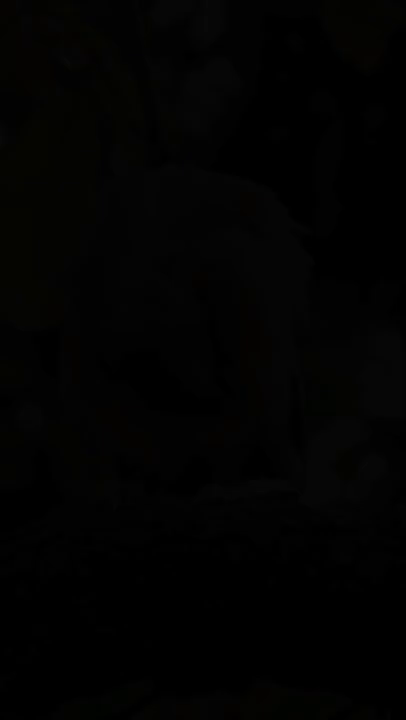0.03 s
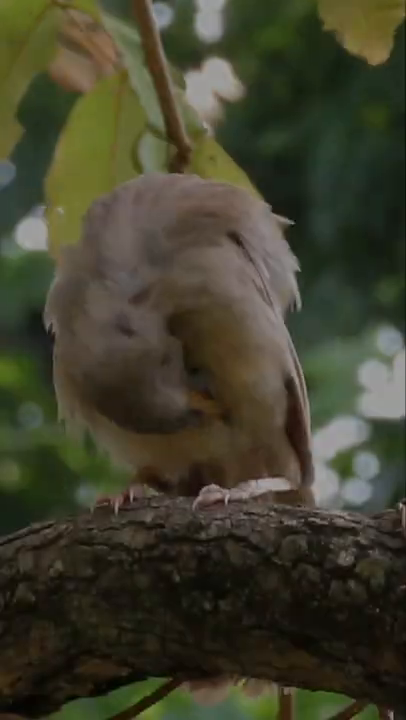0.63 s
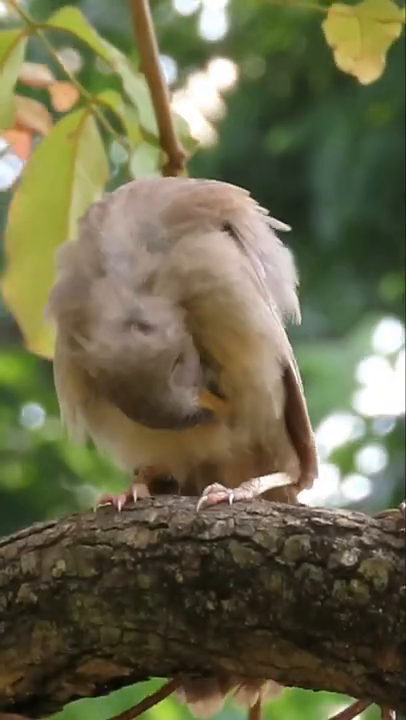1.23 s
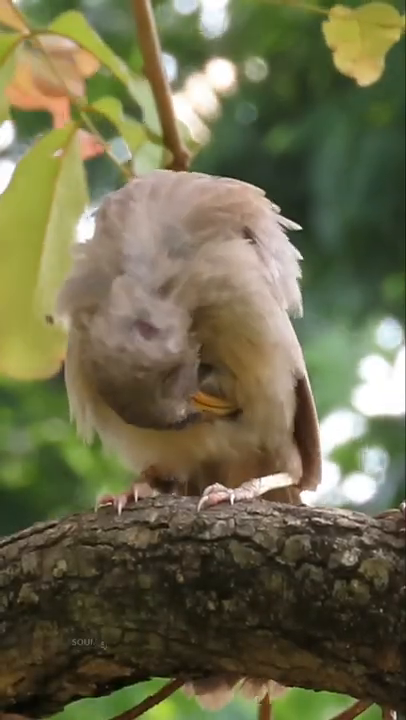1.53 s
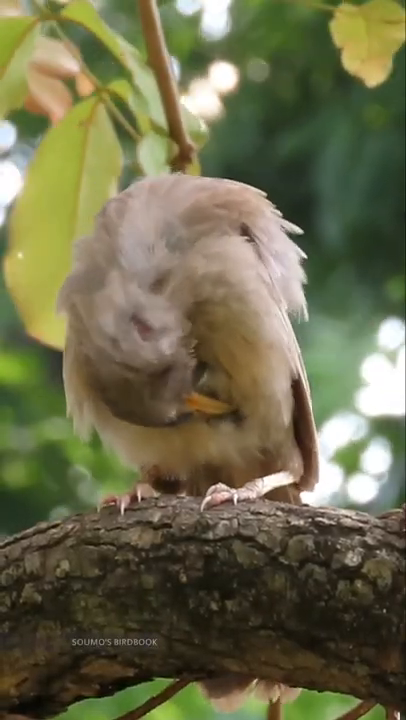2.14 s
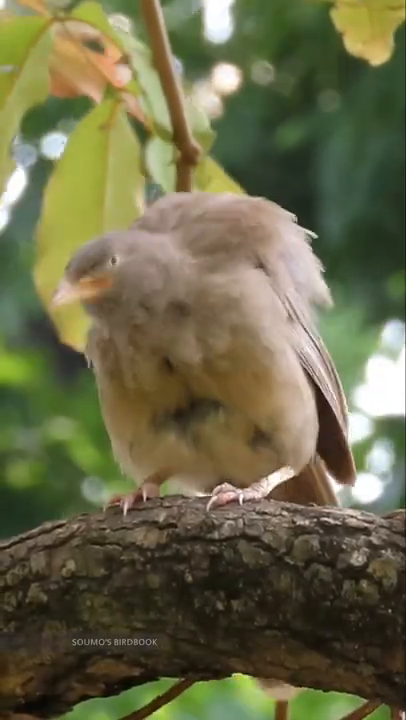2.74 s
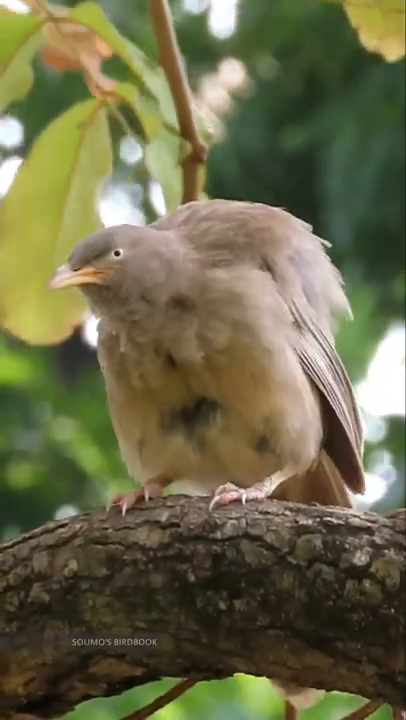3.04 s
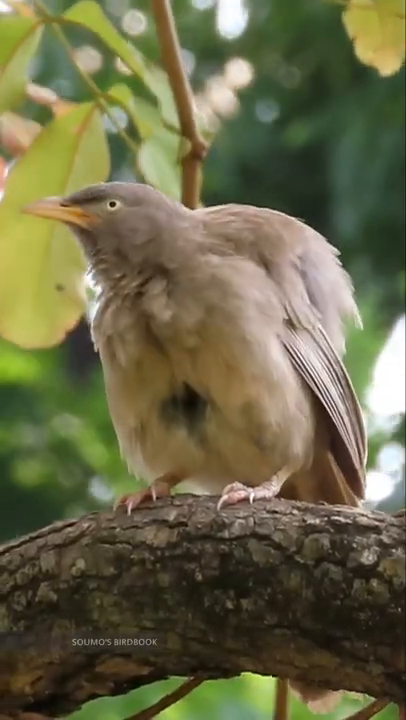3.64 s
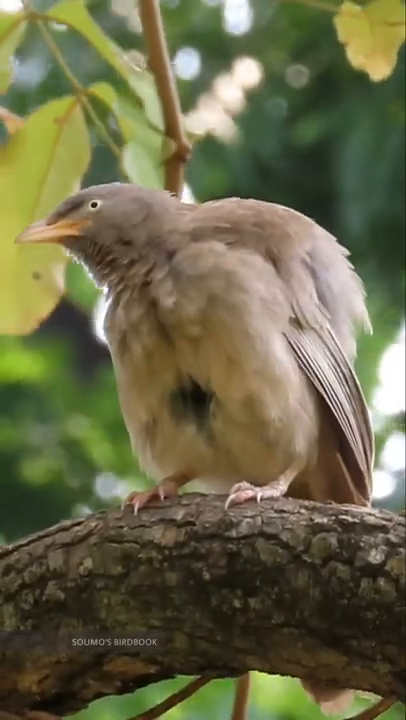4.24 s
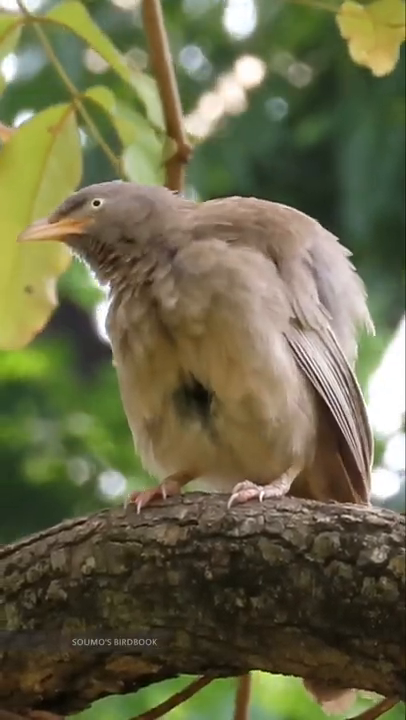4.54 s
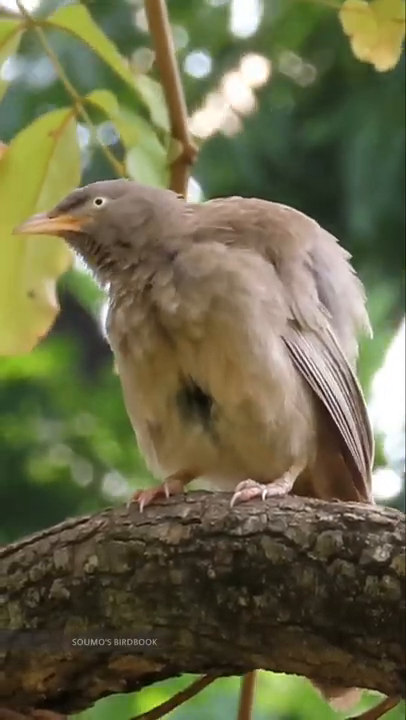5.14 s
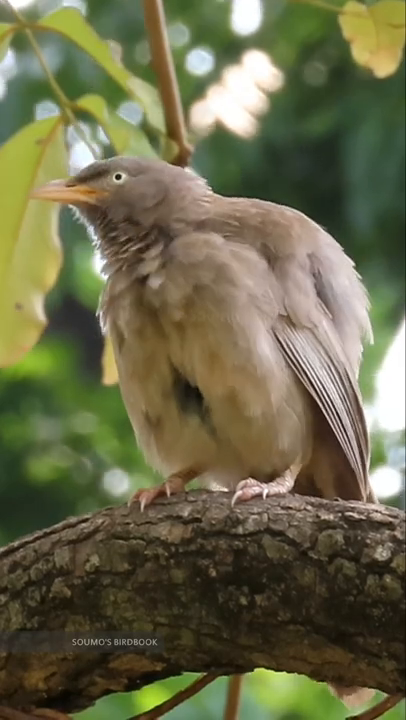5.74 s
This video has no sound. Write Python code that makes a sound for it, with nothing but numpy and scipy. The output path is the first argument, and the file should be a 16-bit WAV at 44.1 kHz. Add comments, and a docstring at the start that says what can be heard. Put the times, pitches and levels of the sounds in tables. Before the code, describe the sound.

A steady distant rumble under a soft hiss of leaves fades in over the first second and continues throughout. From about 0.5 seconds a babbler close on the right gives short buzzy notes and falling squeaks, loudest around 1.4 seconds, where it adds a harsh screech. A second babbler answers from farther left with softer hoarse notes between 1.7 and 2.2 seconds. The near bird screeches again at 2.2 and 2.9 seconds, buzzes and squeaks around 3.3 to 3.6, and screeches once more at 4.3. Small birds add faint thin peeps, then rising chips from about 3.8 seconds. Light woody taps fall near 4.3 and 5.5 seconds, with a faint low hum briefly swelling around 4.7. The farther bird returns with soft squeaks from 5 seconds to the end. Trunks and leaves give every call a light, scattered echo.

```python
"""A steady distant rumble under a hiss of leaves fades in, and babblers call to each other among trees.
A near bird on the right buzzes and squeaks in trilled whistles, and screeches with uneven syrinx pulses
that ring its throat and beak. Another answers from the left; small birds add thin peeps and chips.
Trunks and leaves scatter every call. Late on come a few woody taps and a faint low hum."""
import sys
import numpy as np
from scipy import signal
from scipy.fft import rfft, irfft, next_fast_len
from scipy.io import wavfile

SR = 44100
rng = np.random.default_rng(int(sys.argv[2]) if len(sys.argv) > 2 else 0)


def transcribe(u):
    """Save the signal u as a 16-bit wav file named by the first command-line argument.

    u: samples, shape (n,) or (channels, n), limited to [-1, 1]; the rate is SR.
    q: integer samples, one column per channel.
    """
    v = np.clip(np.atleast_2d(u).T, -1, 1)
    q = np.round(v * 32767).astype(np.int16)
    wavfile.write(sys.argv[1], SR, q)


N = 255339
TIME = np.arange(N) / SR

# the babblers' buzzy notes: t/s, length/s, f/Hz, level/dB, bird
BUZZ_NOTES = [(.502, 0.12, 2700, -37, "near"), (0.692, 0.051, 2400, -45.5, "far"),
              (0.768, 0.067, 2294, -41, "near"), (1.193, 0.1, 2556, -31.5, "near"),
              (1.825, 0.071, 2154, -46.5, "far"), (1.883, 0.055, 2384, -41.5, "far"),
              (1.915, 0.067, 2233, -37.5, "far"), (1.984, 0.06, 2487, -45.5, "far"),
              (2.056, 0.049, 2614, -42.5, "far"), (2.139, 0.048, 2596, -44.5, "far"),
              (3.251, 0.076, 2597, -42, "near"), (3.397, 0.073, 2250, -43, "near"),
              (3.472, 0.034, 2260, -45, "near"), (4.992, 0.074, 2104, -44, "far")]
# their clear squeaks, mostly falling: t/s, length/s, middle f/Hz, glide/octaves, level/dB, bird
SQUEAK_NOTES = [(0.74, 0.036, 2250, -0.52, -32.5, "near"), (.82, 0.027, 2990, 0.17, -45.5, "near"),
                (0.861, 0.015, 2354, -0.29, -33, "near"), (0.876, .045, 1608, -0.32, -43, "near"),
                (1.384, 0.013, 1958, -0.45, -29.5, "near"), (1.43, 0.029, 2316, -0.19, -23.5, "near"),
                (1.457, 0.011, 2132, -.1, -24.5, "near"), (1.666, 0.032, 1914, 0.165, -51, "far"),
                (1.711, 0.026, 1930, 0.13, -43, "far"), (1.739, 0.04, 2514, .15, -49, "far"),
                (1.775, 0.022, 2133, -0.15, -43, "far"), (2.221, .008, 2010, -0.22, -35.5, "near"),
                (3.379, 0.013, 1680, 0.25, -41.5, "near"), (3.397, 0.012, 2117, -.15, -37.5, "near"),
                (3.519, 0.02, 2480, -0.46, -36, "near"), (3.53, 0.056, 2090, -0.46, -39, "near"),
                (5.159, 0.019, 1666, -.8, -43, "far"), (5.2, 0.038, 2766, -0.456, -42.5, "far"),
                (5.261, 0.079, 1840, -0.1, -48, "far"), (5.614, 0.034, 2330, -0.33, -42, "far"),
                (5.653, 0.037, 2320, -0.092, -49, "far"), (5.749, 0.023, 2440, -0.53, -38.5, "far")]


def from_db(db):
    """Decibels to gain."""
    return 10 ** (np.asarray(db) / 20)


def rms_one(x):
    """Scale to rms 1."""
    return x / np.sqrt(np.mean(x ** 2) + 1e-20)


def at_hz(points, hz):
    """Read an EQ curve on a log-frequency axis."""
    freq, value = np.transpose(points)
    return np.interp(np.log(np.maximum(hz, 1)), np.log(freq), value)


def wobble(per_s, t):
    """Random modulation of spread near 1 along the times t."""
    knots = rng.standard_normal(1024)
    return np.interp((t - t[0]) * per_s, np.arange(len(knots)), knots)


def rumble_and_leaves(level_db, sway_db, side_db):
    """Distant rumble, alike in both ears, swells and sinks under a wider, steady hiss of air and leaves."""
    # tone of the noise bed: f/Hz, relative level/dB
    bed_eq = [(13, -20), (22, -3), (70, 2), (182, -11), (298, -10.5), (450, -14), (845, -14.5), (1280, -25),
              (1980, -28), (2150, -29.5), (2330, -31.5), (3430, -33.5), (5170, -39.5), (8020, -46),
              (15500, -59)]
    # its stereo width: f/Hz, side over mid/dB
    bed_width = [(60, -49), (110, -18), (200, -11), (380, -7), (700, -15.5), (1290, -8), (2380, -5),
                 (4400, -5), (8120, -2), (15000, 6.5)]
    size = next_fast_len(N)
    hz = np.fft.rfftfreq(size, 1 / SR)
    colour = from_db(at_hz(bed_eq, hz)) * (hz > 18)
    mid_bins, side_bins = rfft(rng.standard_normal((2, size))) * colour
    mid = irfft(mid_bins, size)[:N]
    side = irfft(side_bins * from_db(at_hz(bed_width, hz) + side_db), size)[:N]
    bed = from_db(level_db) * (mid + side * [[1], [-1]]) / np.std(mid)
    rumble = signal.sosfilt(signal.butter(1, 2900, fs=SR, output="sos"), bed)
    return bed + (from_db(sway_db * wobble(7, TIME)) - 1) * rumble


def note_span(start, length, edge_s=.003):
    """Samples a note covers, a gate with soft ends, and the time since its start."""
    at = np.flatnonzero((TIME > start - edge_s) & (TIME < start + length + edge_s))
    t = TIME[at]
    gate = np.sin(np.pi / 2 * np.clip(np.minimum(t - t[0], t[-1] - t) / edge_s, 0, 1)) ** 2
    return at, gate, np.clip(t - start, 0, length)


def whistles(notes, trill_hz, swing_hz, throb, jitter, overtone_db):
    """Near-sine notes with a trill in pitch and level: in a bird, a second, slow vibration of the syrinx."""
    out = np.zeros(N)
    for at, gate, hz, db in notes:
        t = TIME[at]
        trill = 2 * np.pi * np.cumsum(trill_hz * (1 + .07 * wobble(90, t))) / SR
        pitch_hz = hz * (1 + jitter * wobble(487, t)) + swing_hz * np.sin(trill)
        phase = 2 * np.pi * np.cumsum(pitch_hz) / SR
        tone = np.sin(phase) + from_db(overtone_db) * np.sin(2 * phase)
        out[at] += rms_one(tone * (1 + throb * np.cos(trill))) * gate * from_db(db)
    return out


def place(x, bearing, ear_db=1.5, lag_samples=.94):
    """Pan from -1 (left) to 1 (right): the nearer ear hears the sound louder and slightly sooner."""
    size = next_fast_len(N + 64)
    spectrum, w = rfft(x, size), 2 * np.pi * np.fft.rfftfreq(size)
    return np.array([from_db(side * ear_db) * irfft(spectrum * np.exp(1j * w * side * lag_samples), size)
                     for side in (-bearing, bearing)])[:, :N]


def scatter(x, t60, build_s, per_s, dull_hz):
    """Small echoes at random delays build up and die away; leaves soak up their treble."""
    t = np.arange(SR) / SR
    echoes = rng.standard_normal(SR) * (rng.random(SR) < per_s / SR)
    echoes *= (1 - np.exp(-t / build_s)) * from_db(-60 * t / t60)
    dull = signal.sosfilt(signal.butter(1, dull_hz, fs=SR, output="sos"), x)
    return signal.fftconvolve(dull, echoes / np.sqrt(np.sum(echoes ** 2) + 1e-20))[:N]


def among_trees(x, bearing, early_db, wash_db):
    """Direct sound, early echoes from branches round the bird, and a longer wash from both sides."""
    early = sum(place(scatter(x, t60=.38, build_s=.0022, per_s=1800, dull_hz=8900), side)
                for side in (bearing, bearing / 2))
    wash = sum(place(scatter(x, t60=.88, build_s=.024, per_s=4100, dull_hz=3660), side)
               for side in (-.5, .5))
    return place(x, bearing) + from_db(early_db) * early + from_db(wash_db) * wash


def small_birds():
    """Sagging peeps, thin rising chips and one high, rough note from deep in the foliage."""
    # far-off peeps: t/s, f/Hz, level/dB
    peeps = [(.375, 4960, -59), (2.615, 3010, -55), (2.664, 2940, -59.5), (2.729, 1844, -51.5),
             (2.775, 3370, -56.5), (2.799, 2420, -53), (3.21, 4470, -60.5), (3.4, 4440, -60),
             (4.668, 2524, -57.5), (4.805, 2150, -53)]
    # the high falling note: t/s, length/s, middle f/Hz, glide/octaves, level/dB
    high_notes = [(3.054, 0.0285, 4880, -0.17, -44)]
    # rising chips: t/s, level/dB
    chips = [(3.775, -57), (4.1, -56.5), (4.669, -55), (4.957, -53), (5.237, -53.5), (5.527, -56)]
    thin = whistles([chip(*row) for row in chips] + [peep(*row) for row in peeps],
                    trill_hz=232, swing_hz=13, throb=.05, jitter=.024, overtone_db=-32)
    high = whistles([slur(*row) for row in high_notes],
                    trill_hz=403, swing_hz=500, throb=.49, jitter=.066, overtone_db=-28)
    return (among_trees(thin, bearing=-.5, early_db=-1, wash_db=1)
            + among_trees(high, bearing=0, early_db=-5, wash_db=-9))


def peep(start, hz, db, drop_octaves=.254, drop_s=.00386, fade_db_per_s=78):
    """A peep drops onto its pitch and fades."""
    at, gate, t = note_span(start, length=.026)
    return at, gate, hz * 2 ** (drop_octaves * np.exp(-t / drop_s)), db - fade_db_per_s * t


def sung_by(bird, table, shape):
    """One bird's notes from a table, each given its pitch and level curves."""
    return [shape(*row[:-1]) for row in table if row[-1] == bird]


def near_bird():
    """A babbler close on the right buzzes, squeaks and screeches."""
    harsh = screeches(jitter=.0881, rasp=.73, shimmer=.51)
    buzzes = whistles(sung_by("near", BUZZ_NOTES, buzz),
                      trill_hz=237.5, swing_hz=327, throb=.37, jitter=.023, overtone_db=-37)
    squeaks = whistles(sung_by("near", SQUEAK_NOTES, slur),
                       trill_hz=235, swing_hz=89, throb=.28, jitter=.039, overtone_db=-39)
    return among_trees(harsh + buzzes + squeaks, bearing=1, early_db=-6.5, wash_db=-13)


def buzz(start, length, hz, db, scoop_octaves=.3, scoop_s=.01484, swell_db=10):
    """A buzz scoops up to its pitch, swells, holds and dies away."""
    attack_share, release_share = .42, .18
    at, gate, t = note_span(start, length)
    held = np.minimum(np.minimum(t / attack_share, (length - t) / release_share) / length, 1)
    return at, gate, hz * 2 ** (-scoop_octaves * np.exp(-t / scoop_s)), db - swell_db * (1 - held)


def far_bird():
    """A companion further off on the left answers with softer, hoarse notes."""
    buzzes = whistles(sung_by("far", BUZZ_NOTES, buzz),
                      trill_hz=195.4, swing_hz=207, throb=.32, jitter=.0343, overtone_db=-27)
    squeaks = whistles(sung_by("far", SQUEAK_NOTES, slur),
                       trill_hz=240, swing_hz=100, throb=.4, jitter=.035, overtone_db=-34)
    return among_trees(buzzes + squeaks, bearing=-.8, early_db=-4.5, wash_db=-12)


def slur(start, length, hz, octaves, db, swell_db=7.5):
    """An even glide that is loudest in its middle."""
    at, gate, t = note_span(start, length)
    along = t / length - .5
    return at, gate, hz * 2 ** (octaves * along), db - swell_db * (2 * along) ** 2


def resonance(x, hz, width_hz):
    """Steep-sided resonance whose centre may move: shift down, smooth twice, shift back."""
    turn = np.exp(2j * np.pi * np.cumsum(hz * np.ones(len(x))) / SR)
    r = np.exp(-np.pi * width_hz / SR)
    return 2 * np.real(turn * signal.lfilter([(1 - r) ** 2], [1, -2 * r, r * r], x / turn))


def screech(start, length, db, fade_db_per_s, throat_hz, rough):
    """A screech tightens fast, then slackens: its pulses slow, the throat sinks, the voice roughens."""
    attack_s, swell_db, slacken_s = .032, 15, .05
    tight_hz, slack_hz, scoop_hz = 430.2, 310, 35.2
    sink_hz_per_s, rougher_per_s = 3400, 4.75
    at, gate, t = note_span(start, length)
    onset = np.maximum(1 - t / attack_s, 0) ** 2
    late = np.maximum(t - attack_s, 0)
    tension = np.exp(-(late / slacken_s) ** 1.5)
    pulse_hz = slack_hz + (tight_hz - slack_hz) * tension - scoop_hz * onset
    level = db - swell_db * onset - fade_db_per_s * late
    roughness = np.minimum(rough + rougher_per_s * late, 1)
    return at, gate, pulse_hz, level, throat_hz - sink_hz_per_s * late, roughness


def screeches(jitter, rasp, shimmer):
    """Uneven syrinx pulses, with air noise in each cycle, ring the throat and the beak."""
    # harsh calls: t/s, length/s, level/dB, fade/(dB/s), throat f/Hz, opening roughness/0-1, beak trim/dB
    calls = [(1.369, 0.2, -33, 66, 2730, 0.24, 7), (2.223, 0.12, -28.5, 150, 3000, 0.35, 1.5),
             (2.922, .175, -33.5, 50, 2726, .36, 0.5), (4.307, .2, -28, 96, 2795, 0.38, 4)]
    # throat formants, moving together: multiple of throat f, width/Hz, level/dB
    throat_formants = [(.66, 547, -9.5), (1.02, 1180, 5.5), (1.32, 500, -8.5)]
    # stationary beak resonances: f/Hz, width/Hz, level/dB
    beak_formants = [(5850, 650, -14.5), (10800, 1300, -17)]
    out = np.zeros(N)
    for *row, beak_db in calls:
        at, gate, pulse_hz, db, throat_hz, rough = screech(*row)
        t = TIME[at]
        unsteady = jitter * rough * (wobble(600, t) + wobble(120.06, t))
        phase = 2 * np.pi * np.cumsum(pulse_hz * (1 + unsteady)) / SR
        pulses = rms_one(sum(np.cos(k * phase) for k in range(2, 32)))
        breath = rms_one(rng.standard_normal(len(at)) * (1 + np.cos(phase)))
        source = (pulses + rasp * rough * breath) / np.hypot(1, rasp * rough)
        source *= 1 + shimmer * np.tanh(wobble(285.4, t))
        throat = sum(from_db(level) * resonance(source, ratio * throat_hz, width)
                     for ratio, width, level in throat_formants)
        beak = sum(from_db(level) * resonance(source, hz, width) for hz, width, level in beak_formants)
        effort = from_db(beak_db) * (throat_hz / 2950) ** 4   # the treble fades as the throat slackens
        out[at] += rms_one(throat + effort * beak) * gate * from_db(db)
    return out


def chip(start, db, start_hz=3000, top_hz=4940, rise_s=.022, fade_db_per_s=176):
    """A chip sweeps upward and levels off as it fades."""
    at, gate, t = note_span(start, length=.04)
    return at, gate, top_hz - (top_hz - start_hz) * np.exp(-t / rise_s), db - fade_db_per_s * t


def wood_taps():
    """Something small drops on wood now and then, and the wood rings briefly."""
    # impacts: t/s, strike level/dB
    hits = [(4.271, -47), (4.335, -30), (5.4759, -28.5)]
    # modes of the wood: f/Hz, level/dB, t60/s
    modes = [(630, -13, 0.014), (866, 6, 0.014), (1310, -24, 0.011)]
    clicks, t = np.zeros(N), np.arange(SR // 10) / SR
    for start, db in hits:
        clicks[round(start * SR)] = from_db(db)
    ring = sum(from_db(db - 60 * t / t60) * np.sin(2 * np.pi * hz * t) for hz, db, t60 in modes)
    return place(signal.fftconvolve(clicks, ring)[:N], bearing=.1)


def distant_hum():
    """A low tone wavers faintly in the distance."""
    # one brief swell: t/s, length/s, f/Hz, glide/octaves, level/dB
    swells = [(4.52, .4, 305, 0, -47)]
    tone = whistles([slur(*row) for row in swells],
                    trill_hz=10.3, swing_hz=3.8, throb=.17, jitter=.039, overtone_db=-28)
    return place(tone, bearing=0)


def scene():
    """Birds, taps and a hum over the bed of rumble and leaves."""
    events = near_bird() + far_bird() + small_birds() + wood_taps() + distant_hum()
    return events + rumble_and_leaves(level_db=-37.5, sway_db=1.46, side_db=-.7)


def record(dry):
    """The mix fades in, and a steep low-pass cuts the very top."""
    start_s, full_s, cutoff_hz = .12, 1.15, 15700
    fade = np.clip((TIME - start_s) / (full_s - start_s), 0, 1) ** 1.05
    return signal.sosfilt(signal.ellip(10, .1, 80, cutoff_hz, fs=SR, output="sos"), dry * fade)


dry = scene()
out = record(dry)
transcribe(out)
```